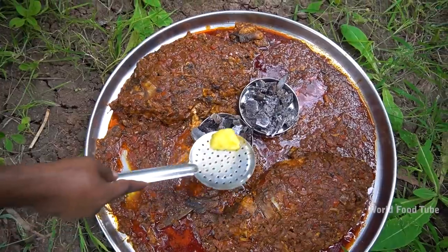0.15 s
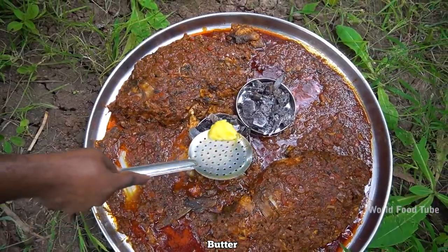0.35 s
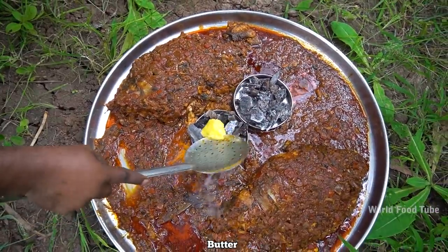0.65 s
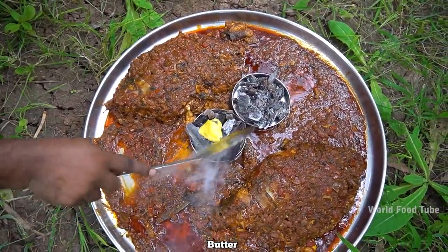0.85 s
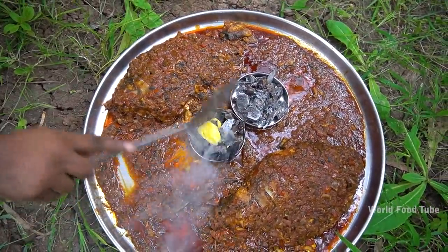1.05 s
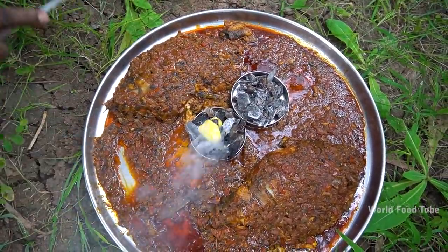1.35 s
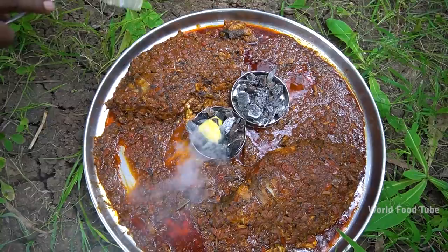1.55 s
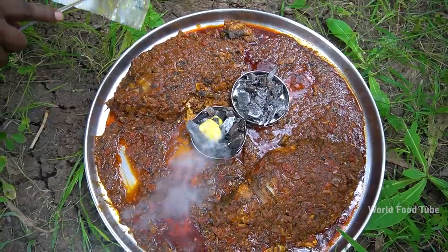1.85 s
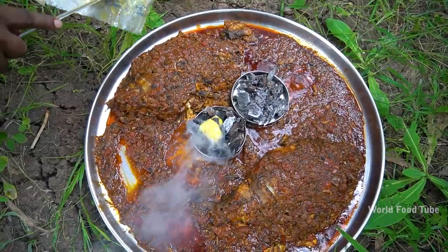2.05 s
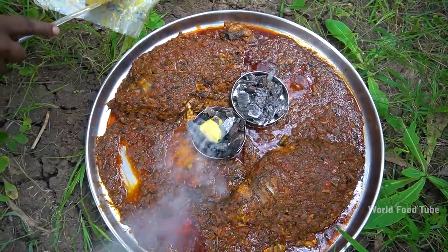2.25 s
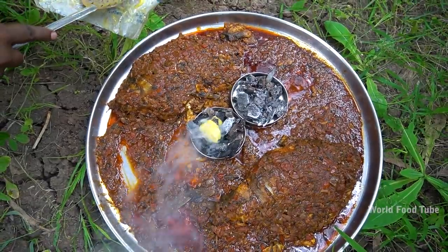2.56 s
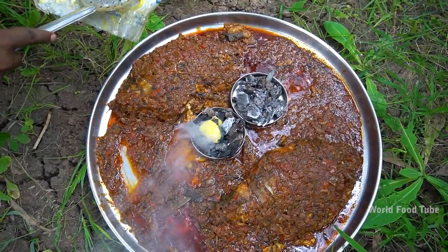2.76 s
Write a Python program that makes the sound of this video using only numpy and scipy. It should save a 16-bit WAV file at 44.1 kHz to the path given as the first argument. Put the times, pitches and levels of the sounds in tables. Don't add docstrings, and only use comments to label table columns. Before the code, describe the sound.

Butter sizzles on hot charcoal in a small metal cup outdoors, close stereo microphone; a dull murmur opens into bright hiss with fine crackles and pops, then the sound slows and darkens twice.

```python
import sys
import numpy as np
from scipy import signal
from scipy.fft import rfft, irfft
from scipy.io import wavfile
from scipy.ndimage import map_coordinates

SR = 44100
rng = np.random.default_rng(int(sys.argv[2]) if len(sys.argv) > 2 else 0)


def rack_gain(trim_db):
    fader = np.asarray(trim_db, float)
    return 10 ** (fader / 20)


def inscribe(sig):
    pcm = np.round(np.clip(np.atleast_2d(sig).T, -1, 1) * 32767)
    wavfile.write(sys.argv[1], SR, pcm.astype(np.int16))


N = 127890

# start in seconds, speed as a share of full speed, # gain in dB, left
# over right in dB.
STRETCHES = [
    (0, 0.92, 1.5, -0.5),
    (1.340, .6, 1, 0),
    (2.556, 0.307, -0.5, -0.3),
]
# time in seconds, sizzle level in dB, fizz against murmur in dB.
HEAT_COURSE = [(0, -49.5, -36), (.055, -48, -27), (.065, -48, -6.5), (.22, -49, -4), (.24, -48, -10),
               (.305, -49, -6), (.315, -46, -3), (.45, -46.5, -3.5), (.8, -46.5, -1), (1.1, -45.5, 0),
               (1.2, -46, -0.5), (1.36, -46, 1), (1.6, -45.5, 0.5), (1.9, -45.5, 0), (2.2, -45, -0.5),
               (2.45, -46.5, -1), (2.75, -45, 0.5), (2.9, -44.5, -1.5)]
# frequency at full speed in Hz, density in dB per Hz.
MURMUR_COLOUR = [(30, -31), (150, -14.5), (500, -1.5), (900, -0.5), (2000, 0), (4000, -4), (8000, -8.5),
                 (24000, -24)]
# frequency at full speed in Hz, density in dB per Hz.
FIZZ_COLOUR = [(300, -27), (1500, -12.5), (4000, -4.5), (8000, -1), (13000, 0), (17000, 0.5), (20500, -1.5),
               (22500, -11)]
# frequency at full speed in Hz, width in Hz, gain in dB.
CUP_MODES = [(1365, 67, 4), (2000, 170, 2.5), (3360, 380, 2.5), (5420, 310, 3.5), (6200, 900, 2),
             (9530, 510, 4), (13000, 2200, 1)]
# time in seconds, peak in dB, ring in Hz.
FAST_POPS = [(.3565, -26, 2200), (0.0604, -30, 9500), (0.0671, -34, 5000), (0.0878, -28, 10000),
             (0.1633, -31, 1800), (0.1695, -27, 5500), (0.1858, -29, 10500), (0.1928, -33, 5500),
             (0.2153, -31, 5000), (0.2214, -31, 4700), (0.2898, -32, 6100), (0.3106, -32, 4000),
             (0.3322, -30, 2200), (0.3799, -29, 3100), (0.4298, -28, 6300), (0.4372, -29, 8600),
             (0.5449, -28, 1800), (0.5926, -23, 11800), (0.6873, -26, 2100), (0.6973, -29, 3300),
             (0.7433, -27, 4600), (0.7698, -29, 11900), (0.782, -28, 2000), (0.792, -27, 3000),
             (0.8717, -29, 3900), (0.951, -29, 15500), (1.0328, -29, 1800), (1.0928, -27, 7600),
             (1.1351, -26, 5300)]
# time in seconds, peak in dB, ring in Hz.
SLOW_POPS = [(1.3595, -26, 5600), (1.3886, -22, 8100), (1.4518, -24, 8500), (1.593, -24, 7800),
             (1.6589, -21, 7300), (1.6801, -23, 3100), (1.705, -25, 6700), (1.74, -16.5, 7600),
             (1.7565, -27, 8200), (1.7578, -24, 3200), (1.7773, -25, 3200), (1.8217, -23, 3200),
             (1.8271, -26, 6100), (1.8331, -27, 3100), (1.871, -27, 10600), (1.9029, -22, 7900),
             (1.9284, -23, 8500), (1.98, -23, 9900), (1.9929, -25, 1200), (2.0574, -22, 7600),
             (2.0703, -27, 3200), (2.0871, -23, 8500), (2.1534, -24, 7500), (2.2243, -22, 3200),
             (2.2773, -26, 10500), (2.2855, -26, 11000), (2.3546, -27, 9900), (2.3648, -28, 1300),
             (2.3693, -27, 9600), (2.5029, -29, 5300), (2.5536, -25, 5600)]
# time in seconds, peak in dB, ring in Hz.
SLOWEST_POPS = [(2.5702, -31, 2800), (2.6101, -27, 1800), (2.6301, -29, 1600), (2.649, -25, 2800),
                (2.6744, -27, 5300), (2.709, -29, 5400), (2.7179, -29, 4500), (2.7776, -23, 5200),
                (2.7789, -25, 1600), (2.7949, -30, 3000), (2.8165, -25, 2900), (2.8296, -31, 2400),
                (2.8465, -27, 3600), (2.8729, -28, 3400), (2.8848, -29, 1300)]
# middle in seconds, length in seconds, pitch in
# Hz, level in dB.
GURGLES = [(.217, .007, 4700, -45), (.311, .008, 3300, -46), (.335, .03, 6300, -46),
           (.357, .008, 2200, -41), (.38, .006, 3140, -44), (.4, .01, 3300, -46),
           (.429, .008, 5900, -44), (.461, .012, 1400, -44), (.462, .01, 2000, -45),
           (.535, .008, 2900, -44), (.549, .016, 1900, -43), (.575, .01, 5700, -45),
           (.603, .01, 990, -45), (.69, .01, 1500, -46), (.769, .008, 5000, -44), (.82, .008, 3200, -45),
           (.845, .012, 1850, -45), (.959, .008, 980, -47), (1.046, .008, 1400, -43),
           (1.068, .01, 1750, -45), (1.095, .013, 7900, -43), (1.377, .007, 3960, -42),
           (1.594, .01, 7060, -41), (1.68, .007, 2200, -43), (1.72, .006, 4700, -43),
           (1.758, .008, 3200, -43), (1.822, .012, 3200, -41), (1.893, .014, 3200, -43),
           (1.928, .01, 3200, -43), (2.038, .01, 3200, -43), (2.058, .008, 3100, -42),
           (2.058, .007, 7700, -41), (2.12, .01, 1250, -43), (2.148, .012, 3200, -42),
           (2.225, .008, 3300, -43), (2.284, .008, 9980, -42), (2.565, .014, 1240, -43),
           (2.575, .02, 2600, -44), (2.6, .03, 500, -45), (2.61, .012, 1570, -42),
           (2.632, .008, 1570, -44), (2.648, .006, 5000, -43), (2.673, .008, 5000, -43),
           (2.719, .007, 4440, -43), (2.78, .007, 2900, -42), (2.781, .008, 1600, -40),
           (2.851, .008, 1240, -46), (2.879, .017, 1600, -46), (2.885, .008, 3300, -43),
           (2.893, .014, 2800, -42)]

TOP_EDGE_HZ, TOP_SLOPE_DB_PER_HZ = 22900, 3.5
SPLICE_FADE_DB_PER_S, SPLICE_RISE_RATIO = 2506, 2.36
BURSTS_PER_S, BURST_SCATTER_DB, BURST_CAP_DB, PAN_SCATTER_DB = 1100, 2, 10, 3
BUBBLE_SIZES, BUBBLE_LOW_HZ, BUBBLE_RATIO, BUBBLE_Q = 8, 853, 1.582, 1.8
STEAM_SIDE_DB, BASS_SIDE_HZ = -6.5, 150
MURMUR_DB, MURMUR_BURST_DB = 2.5, -8.5
FIZZ_DB, FIZZ_BURST_DB, FIZZ_STEAM_DB = 4.5, -2.5, -3
AIR_HZ, AIR_HEAT_SHARE = 8370, 1
FLICKER_DB, SWELL_DB, SWELL_PER_S = 0.55, 0.65, 5.56
SMEAR_T60_S, SMEAR_DB, SMEAR_GAP_S = 0.021, -5, .0002
POP_DB, POP_FAST_DB, POP_HIDDEN_DB, POP_LAG_S = 2, 2, -37, -.0001
POP_BODY_DB, POP_RING_DB, POP_RING_CYCLES, POP_LOW_HZ = 2, -5, 1.8, 684
POP_SPRAY_DB, POP_SPRAY_S, POP_SMEAR_DB = -9.5, 0.00065, -8.5
SPURT_DB, SPURT_Q, SPURT_PAN_DB = -3.5, 4, -4
SPURT_RISE_SHARE, SPURT_FALL_SHARE = .2, .45
OVERLOAD_GAIN = 2.2
LEFT_RIGHT = np.array([[1], [-1]])


def sizzle(speed):
    t = np.arange(N) / SR
    time_s, level_db, fizz_db = np.array(HEAT_COURSE).T
    level_db = np.interp(t, time_s, level_db)
    fizz_db = np.interp(t, time_s, fizz_db)
    crackle = smear(bursts(speed), speed)
    swell_db = SWELL_DB * walk(SWELL_PER_S)

    murmur = steam() + rack_gain(MURMUR_BURST_DB) * crackle
    murmur = unit(shaped(murmur, MURMUR_COLOUR, speed))
    murmur = murmur * rack_gain(MURMUR_DB + FLICKER_DB * walk(25 * speed))

    fizz = rack_gain(FIZZ_STEAM_DB) * steam() + rack_gain(FIZZ_BURST_DB) * crackle
    fizz = unit(shaped(fizz, FIZZ_COLOUR, speed))
    air = signal.lfilter(*signal.butter(1, AIR_HZ * speed, "high", fs=SR), fizz)
    fizz = fizz + air * (rack_gain(AIR_HEAT_SHARE * fizz_db) - 1)
    fizz = fizz * rack_gain(FIZZ_DB + fizz_db + FLICKER_DB * walk(30 * speed))
    return rack_gain(level_db + swell_db) * (murmur + fizz)


def bursts(speed):
    out = 0
    for k in range(BUBBLE_SIZES):
        hz = min(BUBBLE_LOW_HZ * BUBBLE_RATIO ** k * speed, .42 * SR)
        chance, size, pan = rng.random((3, N))
        size_db = np.minimum(-BURST_SCATTER_DB * np.log(size + 1e-9), BURST_CAP_DB)
        hits = (chance < BURSTS_PER_S * speed / SR) * rack_gain(size_db)
        hits = hits * rack_gain(PAN_SCATTER_DB * (pan - 1.0) * LEFT_RIGHT)
        out = out + (-1) ** k * signal.lfilter(*signal.iirpeak(hz, BUBBLE_Q, fs=SR), hits)
    return unit(out)


def steam():
    mid, side = rng.standard_normal((2, N))
    side = signal.lfilter(*signal.butter(1, BASS_SIDE_HZ, "high", fs=SR), side)
    return mid + rack_gain(STEAM_SIDE_DB) * side * LEFT_RIGHT


def pops(table, speed):
    size = 600
    t, out = np.arange(size) / SR, np.zeros((1, N + size))
    click = np.eye(1, N)
    crack = shaped(click, FIZZ_COLOUR, speed) + rack_gain(POP_BODY_DB) * shaped(click, MURMUR_COLOUR, speed)
    crack = crack[0, :size]
    crack = crack / np.abs(crack).max()
    sprays = rng.standard_normal((len(table), size))
    sprays = unit(shaped(sprays, FIZZ_COLOUR, speed)[:, :size])
    spray_decay = np.exp(-t * speed / POP_SPRAY_S) * (t > .0001)
    gain_db = POP_DB + POP_FAST_DB * (speed > .8)
    for (start_s, peak_db, hz), spray in zip(table, sprays):
        ring = np.sin(2 * np.pi * hz * t) * np.exp(-t * hz / POP_RING_CYCLES)
        pop = crack + rack_gain(POP_RING_DB) * ring + rack_gain(POP_SPRAY_DB) * spray * spray_decay
        peak = max(rack_gain(peak_db + gain_db) - rack_gain(POP_HIDDEN_DB), 0)
        i = int((start_s + POP_LAG_S) * SR)
        out[0, i:i + size] -= peak * pop / np.abs(pop).max()
    out = signal.lfilter(*signal.butter(2, POP_LOW_HZ * speed, "high", fs=SR), out[:, :N])
    return smear(out, speed, POP_SMEAR_DB)


def spurts():
    size = 1500
    t, out = np.arange(size) / SR, np.zeros((1, N + size))
    noises = rng.standard_normal((len(GURGLES), size))
    for (middle_s, length_s, hz, db), noise in zip(GURGLES, noises):
        rise_s, fall_s = SPURT_RISE_SHARE * length_s, SPURT_FALL_SHARE * length_s
        gurgle = signal.lfilter(*signal.iirpeak(hz, SPURT_Q, fs=SR), noise)
        gurgle = gurgle * (1 - np.exp(-t / rise_s)) * np.exp(-t / fall_s)
        gurgle = gurgle * np.sqrt(length_s * SR / np.sum(gurgle ** 2))
        i = max(int((middle_s - fall_s) * SR), 0)
        out[0, i:i + size] += rack_gain(db + SPURT_DB) * gurgle
    return smear(out[:, :N], 1) * rack_gain(SPURT_PAN_DB * LEFT_RIGHT / 2)


def shaped(x, table, speed):
    hz = np.arange(1025) * SR / 2048 / speed + 1
    table_hz, table_db = np.array(table).T
    db = np.interp(np.log(hz), np.log(table_hz), table_db)
    for mode_hz, width_hz, gain_db in CUP_MODES:
        db = db + gain_db / (1 + (2 * (hz - mode_hz) / width_hz) ** 2)
    cepstrum = irfft(db * np.log(10) / 20)
    cepstrum[1:1024] *= 2
    cepstrum[1025:] = 0
    response = irfft(np.exp(rfft(cepstrum)))[None, :1024]
    return signal.fftconvolve(x, response, axes=1)[:, :N]


def smear(x, speed, more_db=0):
    t = np.arange(2048) / SR
    decay = rack_gain(-60 * t * speed / SMEAR_T60_S) * (t * speed > SMEAR_GAP_S)
    tail = rng.standard_normal((2, len(t))) * decay
    tail = tail / np.sqrt(np.sum(tail ** 2, axis=1, keepdims=True))
    return x + rack_gain(SMEAR_DB + more_db) * signal.fftconvolve(x, tail, axes=1)[:, :N]


def cut_top(x, speed):
    hz = np.arange(N // 2 + 1) * SR / N / speed
    loss_db = TOP_SLOPE_DB_PER_HZ * np.clip(hz - TOP_EDGE_HZ, 0, None)
    return irfft(rfft(x) * rack_gain(-loss_db), N)


def unit(x):
    return x / np.sqrt(np.mean(x ** 2))


def walk(rate_per_s):
    return unit(map_coordinates(rng.standard_normal(256), [np.arange(N) * rate_per_s / SR]))


def scene():
    t, out, gurgles = np.arange(N) / SR, 0, spurts()
    ends_s = [row[0] for row in STRETCHES[1:]] + [N / SR]
    tables = FAST_POPS, SLOW_POPS, SLOWEST_POPS
    for (start_s, speed, db, pan_db), end_s, table in zip(STRETCHES, ends_s, tables):
        part = rack_gain(db) * sizzle(speed) + pops(table, speed) + gurgles
        part = cut_top(part, speed)
        outside_s = np.clip(t - end_s, 0, .1) + SPLICE_RISE_RATIO * np.clip(start_s - t, 0, .1)
        gate = rack_gain(-SPLICE_FADE_DB_PER_S * outside_s)
        out = out + part * gate * rack_gain(pan_db * LEFT_RIGHT / 2)
    return out


def roll_off(x):
    return signal.sosfilt(signal.butter(12, 16360, fs=SR, output="sos"), x)


def record(dry):
    mix = np.tanh(OVERLOAD_GAIN * dry) / OVERLOAD_GAIN
    return roll_off(mix)


dry = scene()
out = record(dry)
inscribe(out)
```